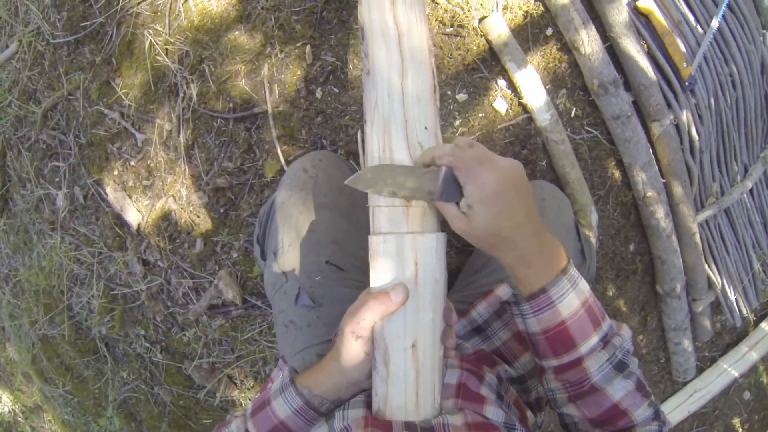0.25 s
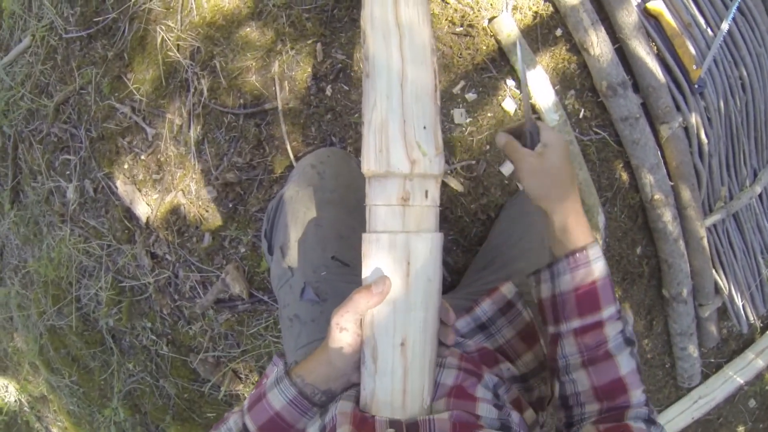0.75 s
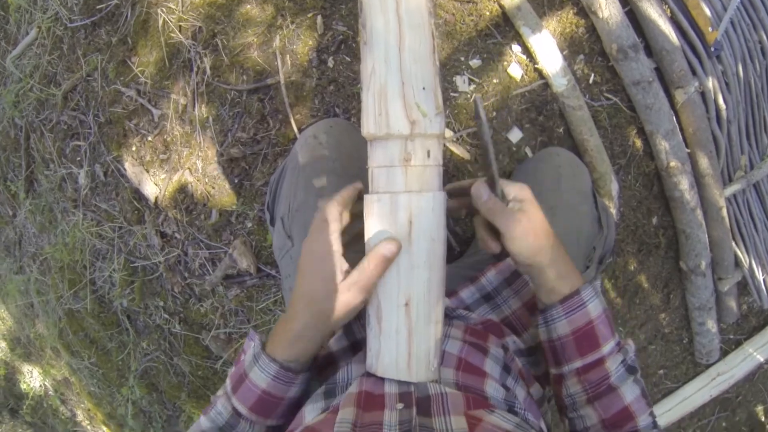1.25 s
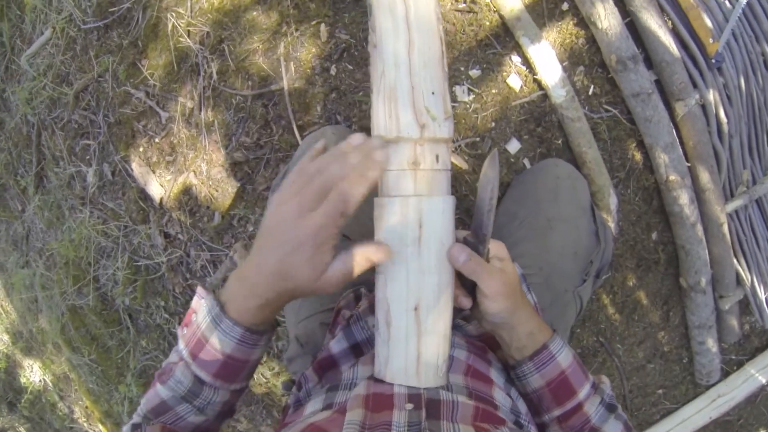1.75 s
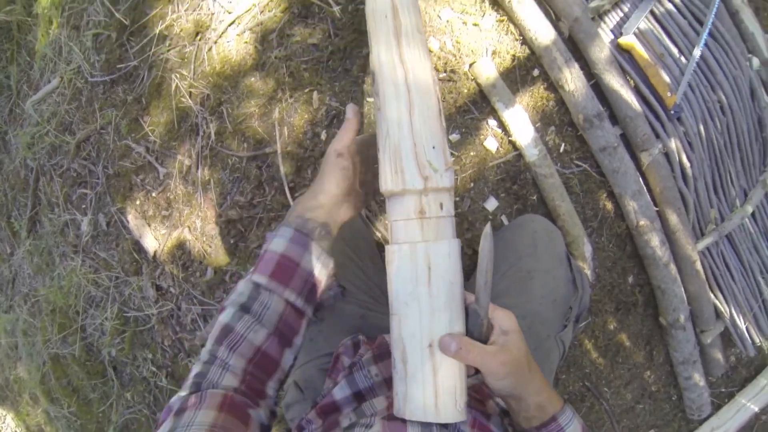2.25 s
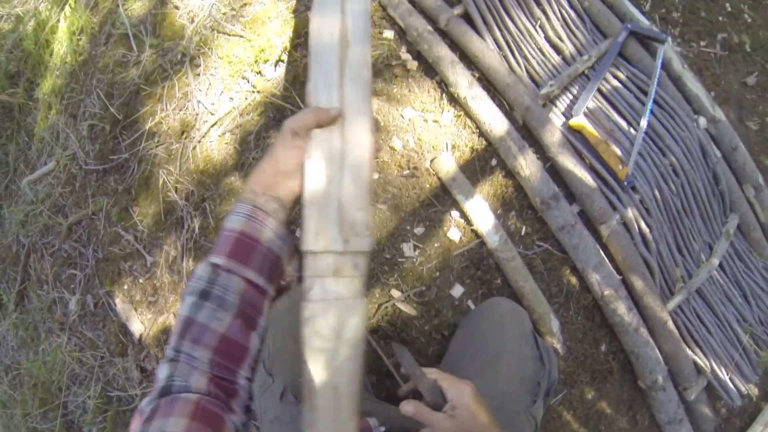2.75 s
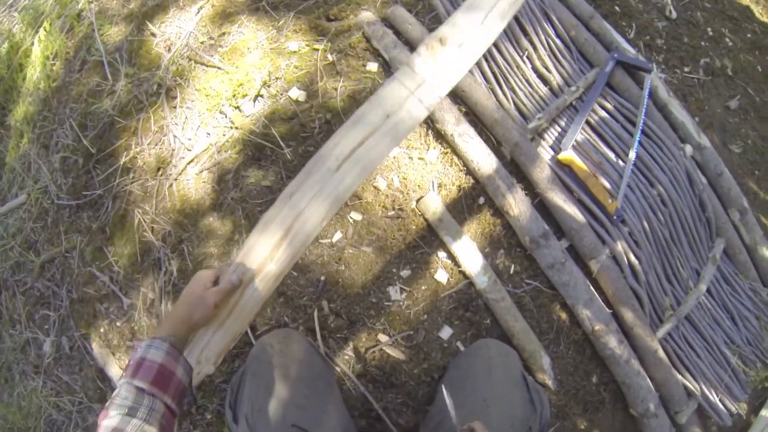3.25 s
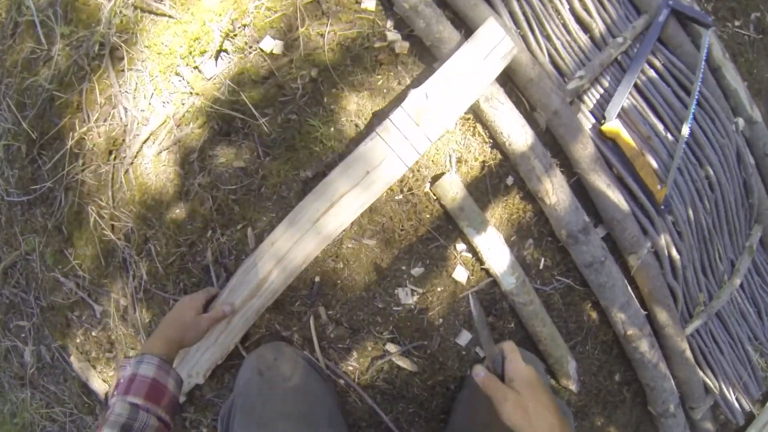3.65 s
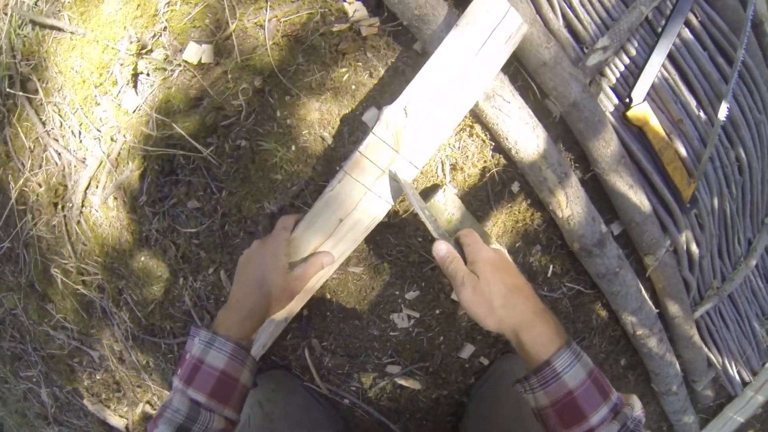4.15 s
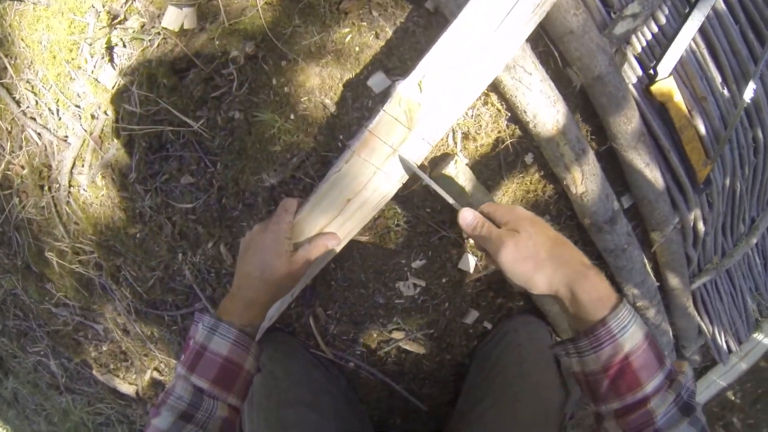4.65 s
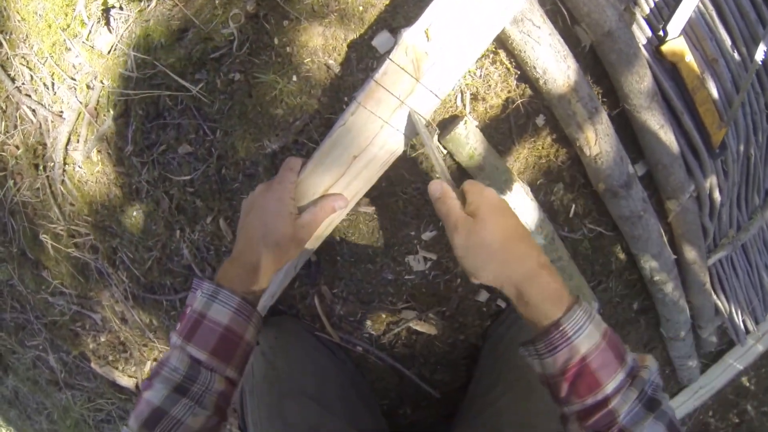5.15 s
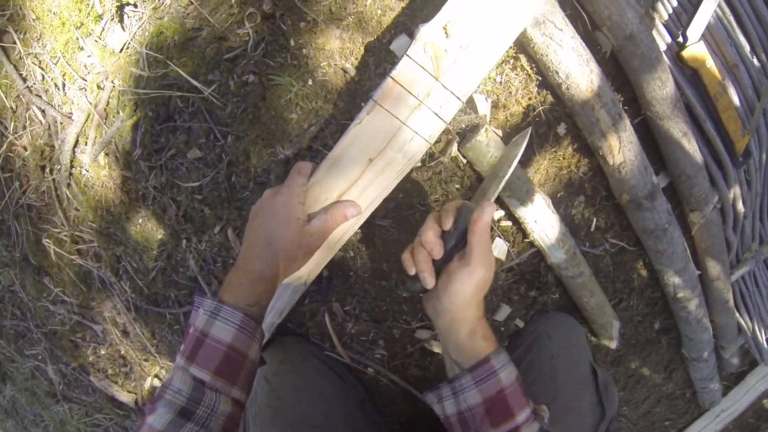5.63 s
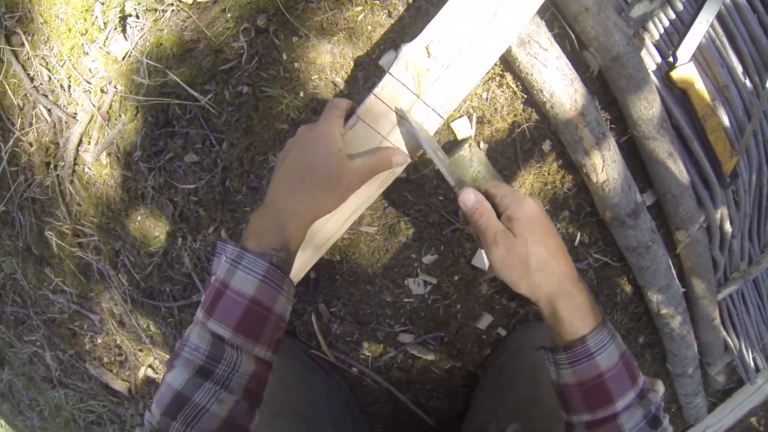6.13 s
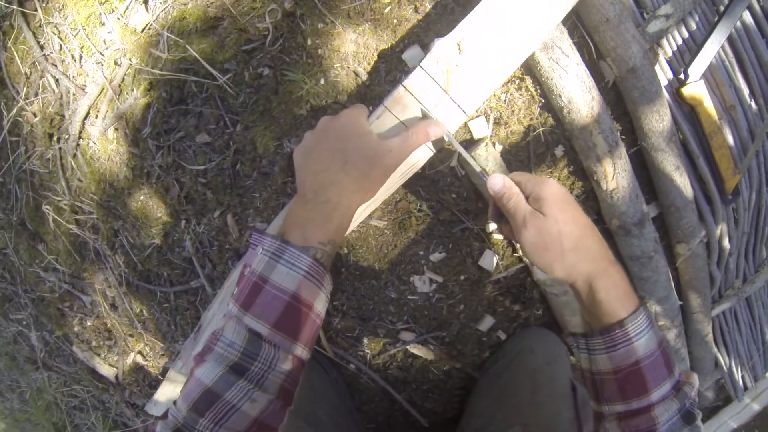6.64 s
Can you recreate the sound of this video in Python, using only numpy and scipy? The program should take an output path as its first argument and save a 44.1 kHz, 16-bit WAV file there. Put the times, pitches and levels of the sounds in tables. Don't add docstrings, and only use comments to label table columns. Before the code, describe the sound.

Close, dry woodwork outdoors: faint fibre ticks and small scrapes from a knife in a notch, then soft hand wipes over wood. Midway the log lands on a pole with a hollow thump and a quick weaker bounce. After a quiet stretch, wood gives way in two extremely loud cracks almost together, trailed by small ticks and a soft brush. Distant road rumble and light wind buffet a small head-worn microphone.

```python
import sys
import numpy as np
from scipy import signal
from scipy.fft import rfft, irfft
from scipy.io import wavfile
from scipy.ndimage import uniform_filter1d

SR = 44100
rng = np.random.default_rng(int(sys.argv[2]) if len(sys.argv) > 2 else 0)


def boost(x):
    u = np.asarray(x, float) / 20
    return 10 ** u


def persist_wave(psi):
    counts = np.round(np.clip(psi, -1, 1) * 32767).astype(np.int16)
    wavfile.write(sys.argv[1], SR, np.atleast_2d(counts).T)


N = 303849
TIME = np.arange(N) / SR

# f/Hz, width/Hz, level/dB
GRAIN = [(520, 88, 0), (820, 110, 10.5), (1100, 270, 7.5), (1840, 150, -1.5), (2114, 200, -2.5)]


def unit(x):
    return x / np.sqrt(np.mean(x ** 2))


def peak(y, db):
    return y * boost(db) / np.abs(y).max()


def band(x, hz, width_hz):
    return signal.lfilter(*signal.iirpeak(hz, hz / width_hz, SR), x)


def between(x, low_hz, high_hz):
    return signal.sosfilt(signal.butter(3, (low_hz, high_hz), "bandpass", fs=SR, output="sos"), x)


def peaks(x, table):
    total = 0
    for k, (hz, width_hz, db) in enumerate(table):
        total = total + (-1) ** k * boost(db) * unit(band(x, hz, width_hz))
    return unit(total)


def walk(rate_hz):
    k = int(SR / rate_hz)
    steps = np.repeat(rng.standard_normal(N // k + 1), k)
    return 1.3 * uniform_filter1d(uniform_filter1d(steps, k), k)[:N]


def swell(s, spread_s):
    return np.exp(-((TIME - s) / spread_s) ** 2)


def ring(modes, push, seconds, tilt_db=0):
    hz, db, t60_s = np.array(modes, float).T[:, :, None]
    t = TIME[:int(seconds * SR)]
    y = np.sum(boost(db + tilt_db) * np.sin(2 * np.pi * hz * t) * 1000. ** (-t / t60_s), axis=0)
    return np.convolve(y, push)[:len(t)]


def add(out, s, y):
    i = int(s * SR)
    out[i:i + len(y)] += y[:N - i]


def grit(spread_db):
    return rng.standard_normal(N) * boost(spread_db * rng.exponential(size=N))


def fibres():
    # t/s, crack/dB, body f/Hz, body/dB, air 5-13.5 kHz/dB
    ticks = [(0.2344, -55, 832, -56, -86), (0.2487, -70, 886, -54, -63), (0.281, -45.5, 501, -56, -57),
             (0.2924, -55, 891, -56, -69), (0.3834, -69, 906, -62, -75), (0.4592, -55, 886, -59, -49.5),
             (0.6197, -64, 993, -42, -75), (0.6868, -64, 1020, -43, -67), (0.6984, -53.5, 872, -46, -71),
             (1.0046, -55, 880, -54, -69), (1.789, -67, 1120, -56, -66), (1.7969, -67, 990, -38, -68),
             (2.7514, -51, 800, -64, -76), (5.365, -46, 800, -52, -58), (5.379, -56, 1100, -38, -72),
             (5.5, -49, 560, -33.5, -74), (5.509, -51, 1187, -31, -69), (5.5614, -64, 983, -60, -83),
             (5.7154, -55, 1213, -50, -74), (5.879, -52, 907, -54, -79), (5.9694, -57, 935, -56, -82)]
    # t/s, crack/dB, body f/Hz, body/dB, tearing time/ms
    snaps = [(0.3338, -41, 540, -33, 3.7), (5.2535, -50, 797, -43, 1.55), (5.258, -42, 790, -27, 1.7),
             (5.2632, -36.5, 760, -16.5, 1.46), (5.2682, -4, 700, -0.5, 2.5),
             (5.2717, -12.5, 705, -6, 1.32), (5.2765, -31, 1100, -25.5, 1.46),
             (5.285, -32, 996, -34.5, 1.1), (5.2961, -1.5, 897, -1, 1.27), (5.3065, -30, 900, -23, 3.6),
             (5.3288, -22, 795, -34, 1.4)]
    # level/dB, fall/(dB/s)
    tears = [
        (-45.5, 420),
        (-41.5, 801),
        (-55, 749.5),
    ]
    # f/Hz, level/dB, t60/s
    body_modes = [(560, -8.5, 0.024), (700, 14, 0.015), (968, 12, 0.018), (1170, 7.5, 0.024),
                  (1573, 5.5, 0.018), (1810, 6.5, .02), (2225, -9, 0.032), (2385, -3.5, 0.027)]
    # f/Hz, level/dB, t60/s
    crack_modes = [(2693, -15, .03), (3330, -12.5, 0.0086), (3540, -1, 0.018), (3980, 11, 0.0056),
                   (4350, -6.5, 0.016), (4796, -10, 0.0091), (5220, -8.5, 0.017)]
    # f/Hz, width/Hz
    notches = [(440, 140), (1400, 380), (2230, 120), (2550, 360), (3060, 390), (4950, 300)]
    tick_ms, snap_air_db = 1.16, -15.5
    tear_start_s, tear_hold_s, tear_rise_db_s = 5.262, 0.061, 1499.5

    events = [(*row, tick_ms) for row in ticks]
    for s, crack_db, hz, body_db, ms in snaps:
        events.append((s, crack_db, hz, body_db, (crack_db + body_db) / 2 + snap_air_db, ms))
    out = np.zeros(N)
    cracks = rng.standard_normal((len(events), 400))
    for (s, crack_db, hz, body_db, air_db, ms), chance in zip(events, cracks):
        tear = TIME[:400] * 1000 / max(ms, .3)
        burst = chance * tear ** 2 * np.exp(-5.0 * tear)
        near_db = np.maximum(-30 * np.log2(np.array(body_modes)[:, :1] / hz) ** 2, -9)
        add(out, s, peak(between(ring(crack_modes, burst, .06), 2100, 4800), crack_db))
        body = between(ring(body_modes, np.hanning(14), .08, near_db), 630, 2836)
        add(out, s + ms * 0.00058, peak(body, body_db))
        spit = between(band(chance, 5500, 4000), 5000, 13500)
        add(out, s, peak(spit * tear ** 2 * np.exp(-4.0 * tear), air_db + 4))

    splinters = grit(2.5) * boost(4.0 * walk(200))
    crack = unit(between(splinters, 3300, 4400))
    body = unit(between(peaks(splinters, GRAIN), 640, 2400))
    air = unit(between(splinters, 5000, 12000))
    early_s = np.maximum(tear_start_s - TIME, 0)
    late_s = np.maximum(TIME - tear_start_s - tear_hold_s, 0)
    for (db, fall_db_s), x in zip(tears, (crack, body, air)):
        out = out + boost(db - tear_rise_db_s * early_s - fall_db_s * late_s) * x
    for hz, width_hz in notches:
        out = out - band(out, hz, width_hz)
    return out


def log_knocks():
    # t/s, ring/dB, thump/dB, thump f/Hz, grit/dB
    knocks = [(.977, -59, -44, 880, -60), (1.793, -49, -45, 700, -67), (2.42, -45, -39.5, 576, -71),
              (3.347, -55, -55, 604.4, -81.5), (3.4737, -14.5, -8.5, 546.6, -60),
              (3.558, -23, -23, 702, -69), (3.59, -39, -36.5, 820, -67), (3.6, -43, -38.5, 200, -70),
              (5.503, -46.5, -43.5, 412, -50.5), (6.151, -45, -39, 620, -66), (.336, -53, -45, 510, -64),
              (2.421, -60, -42.5, 280, -70)]
    # f/Hz, level/dB, t60/s
    log_modes = [(104.7, -10, 0.57), (162, -15.5, 0.34), (327.5, -6, 0.21), (397, -2.5, 0.098),
                 (443.6, 5, 0.22), (492, -8, 0.1), (540, -25, 0.08), (658, -15, 0.27), (819, 1.5, 0.11),
                 (880, -9, 0.22), (1830, -13, 0.04), (2160, -24, .06), (2450, -13, 0.04), (2880, -7, 0.025)]
    landed_t60_s = 0.045

    out = np.zeros(N)
    bark = rng.standard_normal((len(knocks), 2000))
    for (s, ring_db, thump_db, hz, grit_db), chance in zip(knocks, bark):
        contact = np.hanning(int(SR / hz * 0.34) + 3)
        free_s = min([row[0] - s for row in knocks if row[0] > s + .02], default=1)
        choke = 1000. ** (-np.maximum(TIME[:SR // 2] - free_s, 0) / landed_t60_s)
        mode_octaves = np.log2(np.clip(np.array(log_modes)[:, :1], 300, 900) / 500)
        near_db = 16 * np.log2(hz / 530) * mode_octaves
        thump = ring([(hz, 0, .01)], np.hanning(int(SR / hz * 1.02) + 3), .04)
        thump = between(between(thump, 0.51 * hz, 1000), .5 * hz, 1100)
        add(out, s - .002, peak(thump, thump_db))
        add(out, s + 0.0011, peak(ring(log_modes, contact, .5, near_db) * choke, ring_db))
        add(out, s, boost(grit_db) * unit(band(chance, 2500, 2200)) * np.exp(-TIME[:2000] / 0.0041))
    return out


def strokes(rows, sounds):
    slow_db = (-38, -17.5, -17.5)
    out = np.zeros(N)
    for s, rise_s, fall_s, *top_db in rows:
        slow = np.maximum((s - TIME) / max(rise_s, .004), (TIME - s) / max(fall_s, .004))
        at = slow < 1.5
        for db, loss_db, x in zip(top_db, slow_db, sounds):
            out[at] += boost(db + loss_db * slow[at] ** 1.5) * x[at]
    return out


def rubs():
    # fastest t/s, speeding up/s, slowing/s, pressure/dB, skin hiss/dB
    brushes = [
        (.96, 0.052, 0.028, -49, -68.5),
        (1.008, 0.024, 0.015, -44, -75),
        (1.53, .14, 0.061, -53.5, -81),
        (1.57, 0.04, 0.05, -50.5, -52.5),
        (1.62, 0.059, .025, -51, -62.5),
        (1.845, 0.04, 0.031, -48.5, -60),
        (2.752, 0.041, 0.088, -54.5, -80),
        (5.885, 0.035, .05, -52.5, -75.5),
    ]
    # fastest t/s, speeding up/s, slowing/s, scratch/dB, wood/dB
    drags = [
        (.001, .01, 0.011, -61.5, -50),
        (.29, 0.011, .025, -63, -55),
        (.376, 0.041, 0.022, -71.5, -52),
        (.522, 0.014, 0.02, -69, -55.5),
        (2.46, 0.21, 0.28, -70, -55.5),
        (3.495, 0.009, .06, -68, -58),
        (3.575, 0.021, 0.088, -75, -46.5),
        (5.378, 0.035, 0.021, -62, -49.5),
    ]
    # f/Hz, width/Hz, level/dB
    skin = [(7600, 400, -9), (8750, 300, -2), (9850, 300, 0), (8500, 9000, -4)]
    rub_scratch_db = -18.5
    drag_hiss_db = -9.5

    slips = grit(1.5) * boost(1.5 * walk(90))
    soft = grit(0.62)
    hand = (unit(between(peaks(slips, skin), 5500, 11600)),
            unit(between(slips, 2240, 4960)),
            peaks(slips, GRAIN))
    drag = (unit(between(soft, 4200, 11500)),
            unit(between(soft, 2200, 5200)),
            peaks(soft, GRAIN))
    brushed = [(s, rise, fall, hiss_db, db + rub_scratch_db, db) for s, rise, fall, db, hiss_db in brushes]
    dragged = [(s, rise, fall, db + drag_hiss_db, db, wood_db) for s, rise, fall, db, wood_db in drags]
    return strokes(brushed, hand) + strokes(dragged, drag)


def squeaks():
    # t/s, f/Hz, level/dB, t60/s
    squeak_modes = [(.688, 9340, -66, .02), (.699, 9400, -64, .02), (1.789, 8600, -62, .015),
                    (1.796, 9700, -63, .015), (5.42, 6150, -68.5, .06), (0.956, 1840, -47.5, 0.084),
                    (1.598, 2100, -49, 0.046), (2.752, 2006, -51, 0.049), (5.716, 1200, -48, .06),
                    (5.888, 900, -46, 0.075), (5.888, 1200, -49.5, 0.052), (5.51, 1200, -43.5, 0.052),
                    (.522, 9500, -64, .03)]
    out = np.zeros(N)
    push = np.hanning(60) * np.cos(np.arange(60.) ** 2 / 20)
    for s, hz, db, t60_s in squeak_modes:
        add(out, s, peak(band(ring([(hz, 0, t60_s)], push, .1), hz, hz / 4), db))
    return out


def road():
    # t/s, level/dB
    traffic = [(0.0, -62), (0.73, -57), (1.34, -59), (1.73, -57.5), (2.76, -59.5), (3.53, -58),
               (5.51, -62.5), (5.95, -59), (6.89, -62)]
    # f/Hz, level/(dB per Hz)
    air = [(5.9, -55.5), (10, -13), (21, -13.5), (38, -2.5), (92, -3.5), (176, -13), (284, -14),
           (411, -20.5), (981, -15), (1350, -26.5), (1700, -24), (2400, -33.5), (3120, -53.5), (5280, -120)]
    # f/Hz, level/(dB per Hz)
    hiss = [(2850, -40.5), (3700, -39), (4600, -47), (7700, -54.5), (12000, -57.5), (15500, -65.5),
            (16500, -76)]
    # nearest t/s, heard +-/s, f/Hz, glide/(Hz/s), level/dB
    drones = [(4, 9, 50.3, .05, -53.5), (.5, .25, 49.6, -3, -48), (1.4, .35, 47.5, -1.5, -52),
              (.8, 1.8, 95, -.1, -59.5), (4.5, .6, 94, -3, -55), (6.6, .7, 90.5, -.8, -52),
              (.1, .35, 155.5, -2.2, -60), (1.1, .6, 120, 8, -63.5), (3.3, 1.1, 130.5, -5.5, -59.5),
              (6.3, .9, 122, 5, -65), (6.55, .5, 233, -9, -65)]
    rumble_share, lorry_share, rumble_wander_db = .3, .3, 1.5
    lorry_s, lorry_spread_s, lorry_db = 6.9, .8, 5.5

    s, level_db = np.transpose(traffic)
    roar = np.interp(TIME, s, level_db - level_db.mean())
    rumble = rumble_share * roar + rumble_wander_db * walk(2.9)
    lorry = lorry_share * roar + lorry_db * swell(lorry_s, lorry_spread_s)
    f = np.arange(N // 2 + 1) * SR / N + 1e-3
    hz, db = np.transpose(air[:-2] + hiss)
    sound = rfft(rng.standard_normal(N)) * boost(np.interp(np.log(f), np.log(hz), db))
    out = 0
    for centre in np.arange(3.5, 14.5, .5):
        part = irfft(sound * np.cos(np.pi * np.clip(np.log2(f) - centre, -.5, .5)) ** 2, N)
        low, mid = np.clip(7.2 - centre, 0, 1), np.clip(9 - centre, 0, 1)
        high = np.clip(centre - 10.4, 0, 1)
        swell_db = low * rumble + (mid - low) * lorry + (1 - mid) * (1 - .6 * high) * roar
        out = out + part * boost(swell_db + walk(3))
    out = unit(out) * boost(-51)
    for s, spread_s, hz, glide_hz_s, db in drones:
        pitch_hz = (hz + glide_hz_s * (TIME - s)) * (1 + 0.013 * walk(4.5))
        level = np.sqrt(2) * swell(s, spread_s) * boost(db + 1.6 * walk(7.8))
        out = out + level * np.sin(2 * np.pi * np.cumsum(pitch_hz) / SR)
    return out


def insects():
    # f/Hz, width/Hz, level/dB
    trills = [(5100, 300, -92), (10160, 530, -90), (15110, 500, -96)]
    throb, noise = boost(2.2 * walk(60)), rng.standard_normal(N)
    return throb * sum(boost(db) * unit(band(band(noise, hz, w), hz, w)) for hz, w, db in trills)


def bird():
    s, spread_s, hz, glide_hz_s, db = 4.23, .05, 11900, -5500, -85
    pitch_hz = np.clip(hz + glide_hz_s * (TIME - s), 0, 15e3)
    return boost(db) * swell(s, spread_s) * np.sin(2 * np.pi * np.cumsum(pitch_hz) / SR)


def buffet():
    # t/s, +-/s, level/dB
    gust_rows = [
        (0.0, 0.065, -37.5),
        (.42, .12, -51),
        (.93, 0.21, -47.5),
        (1.47, .15, -47),
        (1.95, 0.34, -51),
        (3.3, 0.99, -53),
        (4.9, .4, -58),
        (6.1, .6, -64),
    ]
    gusts = sum(boost(db) * swell(s, spread_s) for s, spread_s, db in gust_rows)
    return gusts * unit(between(rng.standard_normal(N), 7.1, 36))


def scene():
    work = fibres() + log_knocks() + rubs() + squeaks()
    t = TIME[:int(.15 * SR)]
    scatter = band(rng.standard_normal(len(t)), 1200, 2700) * 1000. ** (-t / 0.11) * (t > .003)
    work = work + boost(-47.0) * signal.fftconvolve(work, scatter)[:N]
    return (work + road() + buffet() + insects() + bird())[None]


def low_pass(x):
    return signal.sosfilt(signal.butter(12, 16500, fs=SR, output="sos"), x)


def record(dry):
    lag_s, release_s, knee_db, slope = .045, .06, -34.5, 0.1
    keep = np.exp(-1 / (release_s * SR))
    power = signal.lfilter([1 - keep], [1, -keep], dry ** 2)
    held = np.roll(power, int(lag_s * SR), axis=1)
    dry = dry * (1 + held / boost(2 * knee_db)) ** -slope
    dry = np.tanh(.8 * dry) / .8
    dry = signal.sosfilt(signal.ellip(8, .5, 80, 15600, fs=SR, output="sos"), dry)
    return low_pass(dry)


dry = scene()
out = record(dry)
persist_wave(out)
```